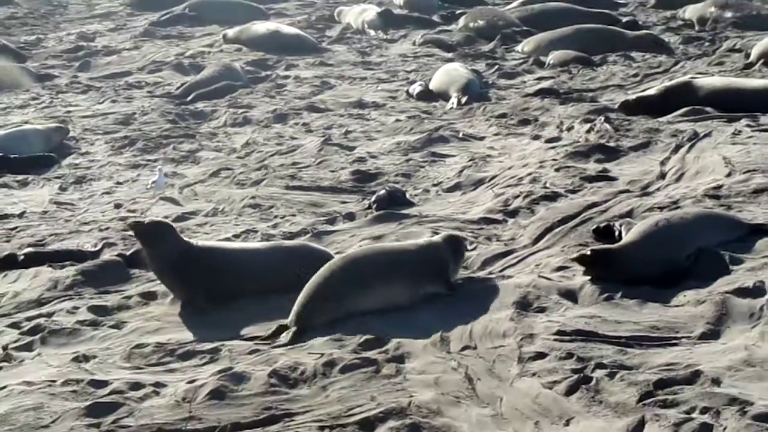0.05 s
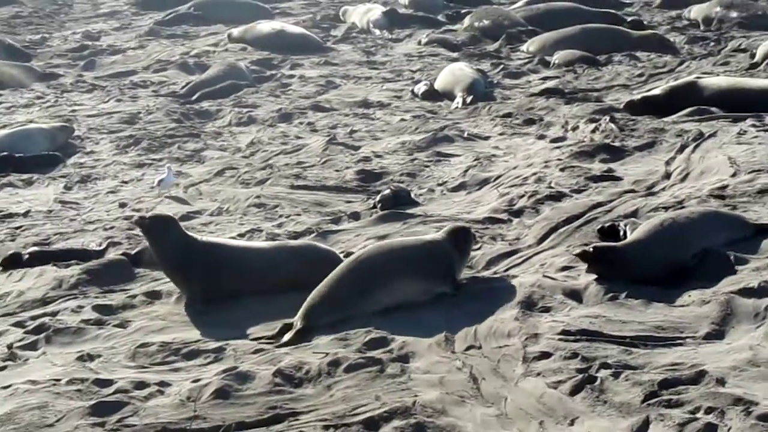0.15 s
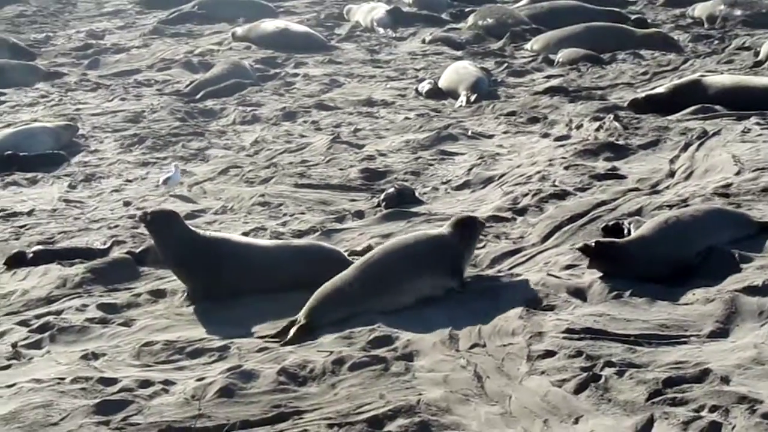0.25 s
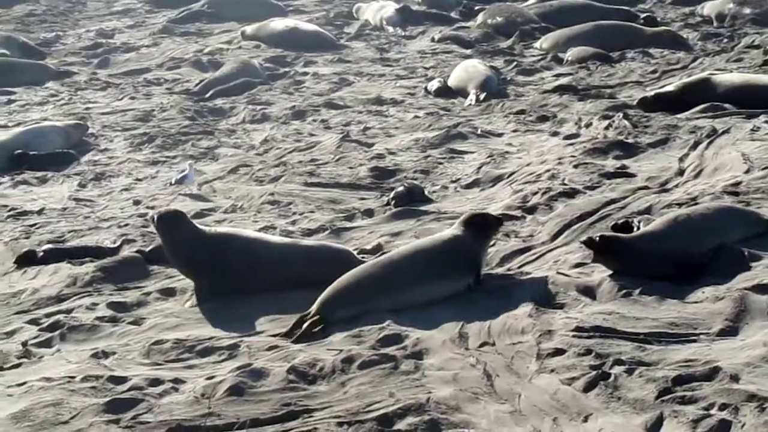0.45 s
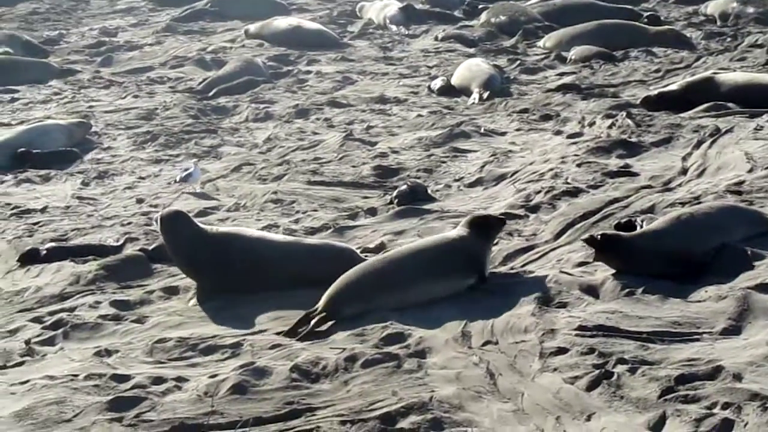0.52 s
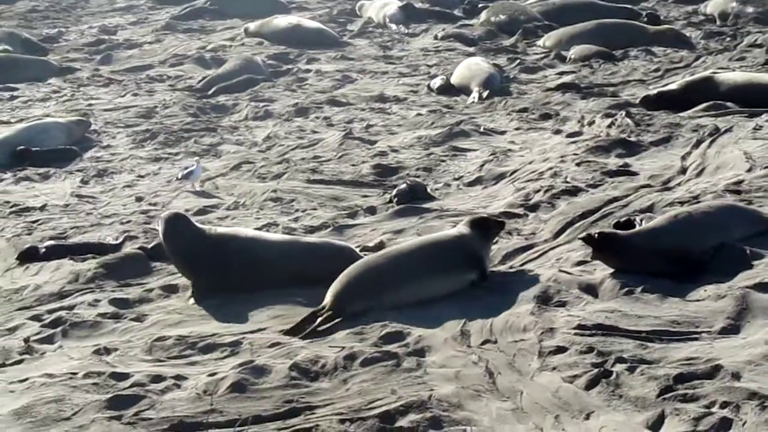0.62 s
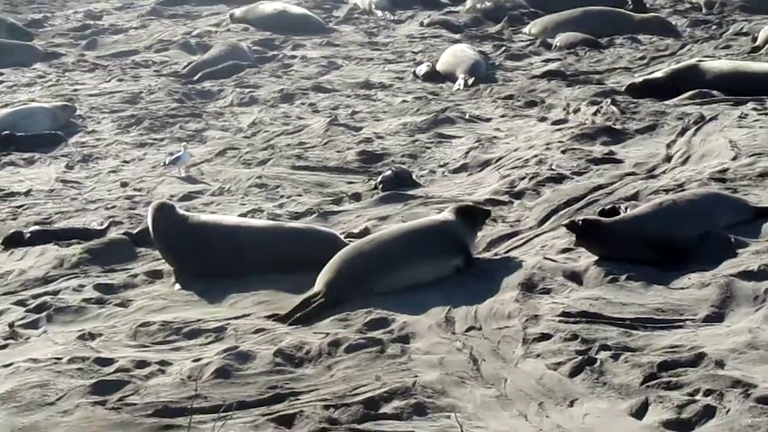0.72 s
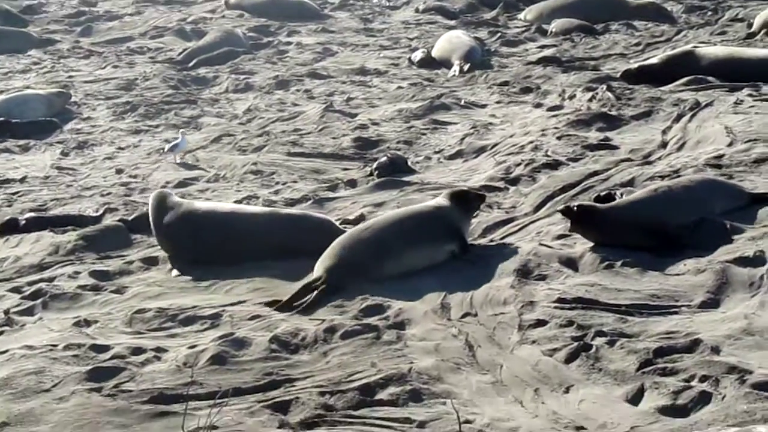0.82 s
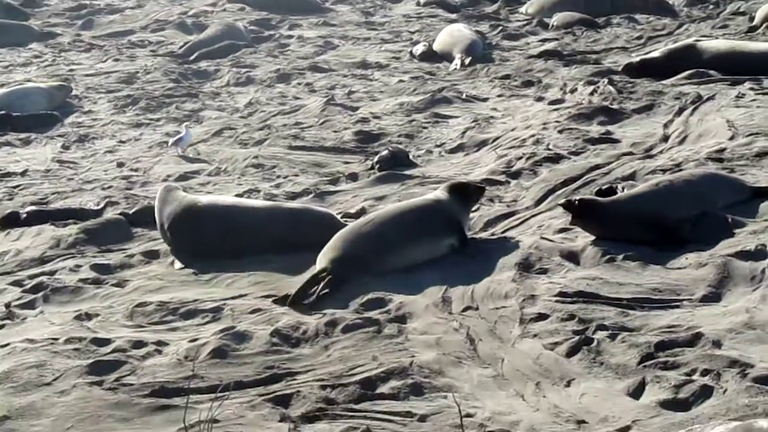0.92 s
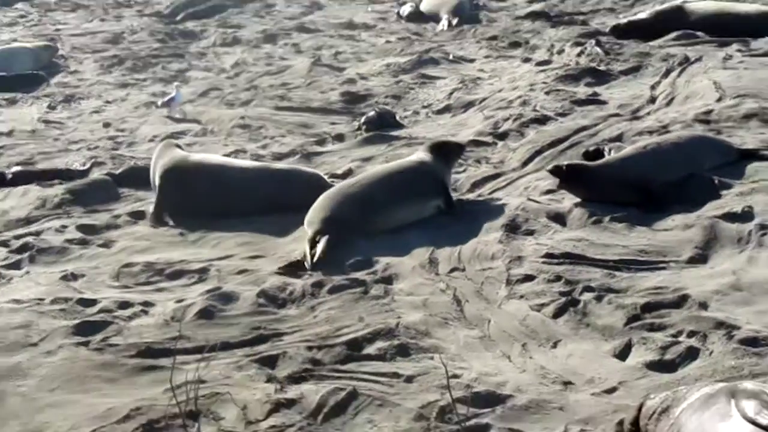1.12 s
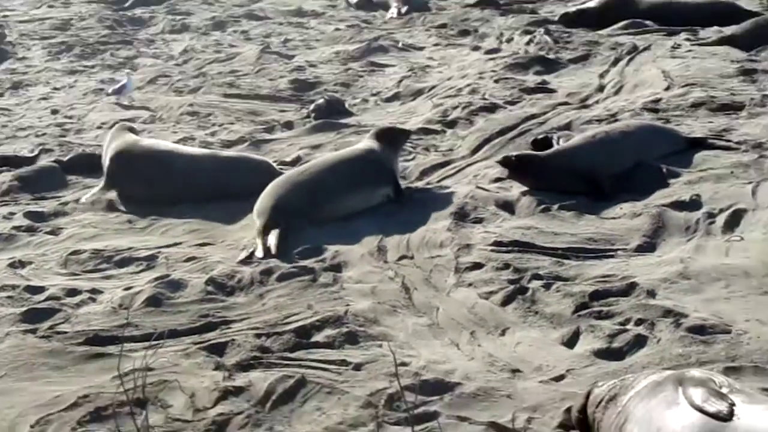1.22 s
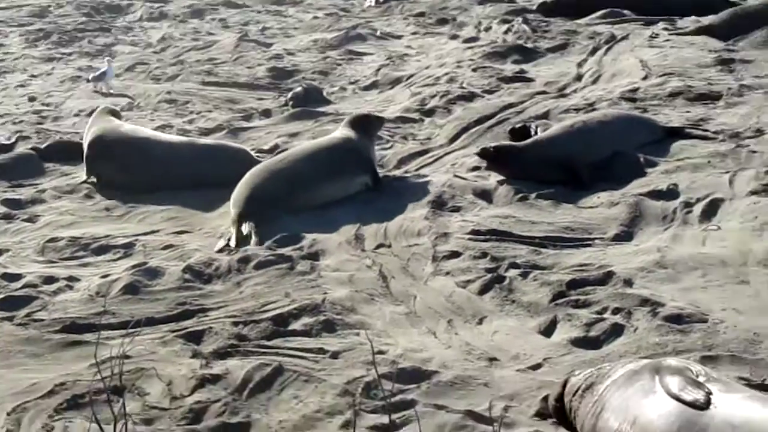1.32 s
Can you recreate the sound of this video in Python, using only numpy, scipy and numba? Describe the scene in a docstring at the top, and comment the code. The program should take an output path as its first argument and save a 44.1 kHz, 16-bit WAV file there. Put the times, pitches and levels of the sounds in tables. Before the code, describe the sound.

A young seal yelps twice, high and raspy, over steady surf and wind.

```python
"""A young seal yelps twice on a beach: a high, nearly pure cry with a faint echo.
A slower flutter in its throat breaks the cry into a rasp.
Other seals call far off over steady surf and wind, with a few faint ticks.
An automatic gain control turns everything down at the first yelp and lets it creep back."""
import sys
import numpy as np
from scipy import signal
from scipy.fft import rfft, irfft
from scipy.io import wavfile
from scipy.ndimage import uniform_filter1d, map_coordinates
from numba import njit

SR = 44100
rng = np.random.default_rng(int(sys.argv[2]) if len(sys.argv) > 2 else 0)


def log_audio(samples):
    """Write samples as a 16-bit WAV file to the path given in sys.argv[1]."""
    # one column per channel
    frames = np.atleast_2d(samples).T
    # limit to full scale, then quantise
    limited = np.clip(frames, -1, 1)
    pcm = np.round(limited * 32767).astype(np.int16)
    wavfile.write(sys.argv[1], SR, pcm)


N = 59535
T = np.arange(N) / SR


def young_seal():
    """Two short yelps close by, each harsh at first and then clearer."""
    # One list per yelp. Each row: time in seconds, pitch in Hz, level in dB,
    # then flutter depth, rasp and harshness, each from 0 to 1.
    yelps = [
        [(.224, 616, -33.5, .3, 0.97, .4), (.233, 689.2, -12, 0.23, 0.13, 0.74), (.254, 852, -7, 0, .03, 0.58),
         (.268, 894, -3.6, 0, 0, 0.3), (.305, 935.5, 0.6, 0.05, 0.03, 0.1),
         (.342, 971.4, 0.4, 0.05, 0.06, 0.11), (.379, 993.4, -3, 0.19, 0.12, 0),
         (.389, 933, -10, 0.94, 0.47, .2), (.402, 856, -17, 0.34, 1, 0.35), (.425, 820, -34.5, 0.7, 0.5, .3)],
        [(.694, 992, -41.5, 0.27, 0.58, 0), (.702, 1015, -14, 0.26, 0.33, 0.08),
         (.709, 944, -30, 0.59, 0.74, 0.45), (.714, 907.6, -15, 0.74, 0.58, 1),
         (.728, 830, -19.5, 0.61, 0.5, 0.93), (.7295, 825.4, -8.5, 0.42, 0.12, 1),
         (.751, 887, -9.5, 0.37, 0.13, 1), (.758, 983, -2.5, 0.46, 0.03, 0.54),
         (.785, 1014, -0.2, 0.29, 0, 0.18), (.815, 1037, -1.5, .55, 0.04, 0.1),
         (.831, 1004, -7, 0.5, 0.13, 0.14), (.845, 867, -14.5, 0.9, 0.76, .5), (.86, 847, -22, 0.2, .95, .6),
         (.87, 790, -50, .6, .9, .5)],
    ]
    return sum(yelp(rows) for rows in yelps)


def yelp(rows):
    """One cry: each pinch of the throat makes it lower, quieter and harsher."""
    pitch_sag, pitch_jitter, rasp_jitter, pinch_harshness = .21, .0079, .056, 1.1
    times, hz, db, depth, rasp, harsh = np.array(rows, float).T
    hz, db, depth, rasp, harsh = (np.interp(T, times, c) for c in (hz, db, depth, rasp, harsh))
    sounding = (T > times[0]) & (T < times[-1])
    pinch = depth * flutter(sounding)
    hz *= 1 - pitch_sag * pinch + pitch_jitter * wander(500) + rasp_jitter * rasp * wander(600)
    harsh = np.clip(harsh + pinch_harshness * pinch, 0, 1)
    tone = np.zeros(N)
    tone[sounding] = voice(hz[sounding], harsh[sounding])
    opening = 1 - pinch
    cry = tone * opening * np.sqrt(1 - rasp ** 2) + breath(opening, rasp)  # tone gives way to rasp
    soft_edges = uniform_filter1d(sounding * 1., size=128)
    return cry * undb(db) * soft_edges


def voice(hz, harsh):
    """Twelve harmonics (whole multiples of the pitch), blended from clear to harsh."""
    # Each row of both tables: frequency in Hz, level of a harmonic there in dB.
    clear_levels = [(650, 0), (1000, -1), (1350, -18), (1800, -12), (2000, -14.5), (2700, -42.5),
                    (3100, -45), (3800, -56.5), (5200, -59), (8500, -61.5), (11000, -63.5), (13000, -73)]
    harsh_levels = [(650, -3), (1000, -2), (1350, -23.5), (1650, -7.5), (2100, -22.5), (2550, -13.5),
                    (3000, -14.5), (3400, -48), (5200, -49), (8500, -47), (11000, -53), (13000, -64.5)]
    phase = cycles(hz)
    tone = np.zeros(len(hz))
    for k in range(1, 13):
        db = (1 - harsh) * at_hz(clear_levels, k * hz) + harsh * at_hz(harsh_levels, k * hz)
        tone += undb(db) * np.sin(k * phase)
    return np.sqrt(2) * tone


def flutter(sounding):
    """The throat pinches in slightly uneven beats: 0 is open, 1 is tightest."""
    # Each row: time in seconds, beats per second.
    beat_rates = [(.23, 179.7), (.37, 163.5), (.4, 257.6), (.728, 171.7), (.746, 75.3), (.812, 78),
                  (.828, 151.6), (.86, 246)]
    scatter, sharpness = .07, 2.2
    beat_hz = over_time(beat_rates) * (1 + scatter * wander(120))
    return (.5 + .5 * np.cos(cycles(beat_hz * sounding))) ** sharpness


def breath(opening, rasp):
    """Puffs of air ring the throat into a rasp, with a thin hiss on top."""
    # Each row: ringing frequency in Hz, width in Hz, relative level in dB.
    throat = [(820, 160, -6), (1114, 108, 5), (1632, 140, -5), (1997, 400, -11), (2480, 220, -15.5)]
    rasp_db, hiss_db = -1.5, -54.5
    air = rng.standard_normal(N) * opening
    rattle = unit(sum(undb(db) * resonate(air, hz, width) for hz, width, db in throat))
    hiss = unit(resonate(air, hz=9200, width_hz=2900))
    return undb(rasp_db) * rasp * rattle + undb(hiss_db) * hiss


def echo(x, level_db=-38, delay_s=.025, fade_60_db_s=.28):
    """The beach scatters a little sound back, differently to each ear."""
    fade = (T > delay_s) * np.exp(-np.log(1000) * T / fade_60_db_s)
    tail = unit(rng.standard_normal((2, N)) * fade) / np.sqrt(N)
    return undb(level_db) * signal.fftconvolve(x[None], tail, axes=1)[:, :N]


def far_seals(overtone_db=-11):
    """Faint, unsteady cries from further along the beach."""
    # Each row: start and length in seconds, first and last pitch in Hz, level in dB,
    # wobble as a fraction of the pitch.
    calls = [(-.02, 0.154, 655, 771.7, -32.5, 0.015), (0.127, 0.067, 676.5, 656, -39, 0.1),
             (0.424, 0.11, 834.6, 804, -32, .03), (1.291, 0.15, 652.6, 611, -26, 0.18)]
    out = np.zeros(N)
    for start, length, from_hz, to_hz, db, wobble in calls:
        progress = np.clip((T - start) / length, 0, 1)
        glide_hz = from_hz + (to_hz - from_hz) * progress
        phase = cycles(glide_hz * (1 + wobble * wander(250)))
        swell = np.sqrt(8 * progress * (1 - progress))
        out += undb(db) * swell * (np.sin(phase) + undb(overtone_db) * np.sin(2 * phase))
    return out


def ticks(fade_s=.003):
    """Tiny dry ticks close by: bursts of high noise that die at once."""
    # Each row: start in seconds, level in dB.
    bursts = [(0.906, -39), (0.929, -36.5), (1.044, -45), (1.284, -36), (1.328, -51)]
    loudness = sum(undb(db) * (T >= start) * np.exp(-np.abs(T - start) / fade_s) for start, db in bursts)
    return loudness * unit(resonate(rng.standard_normal(N), hz=5770, width_hz=3400))


def surf(swell_db=.55, flicker_db=.8):
    """The rush of surf and wind: octave bands of noise swell together and flicker separately."""
    # Each row: frequency in Hz, relative level in dB.
    spectrum = [(20, -33.5), (40, -24.5), (65, -15.5), (110, -12), (170, -6.5), (300, 1), (450, -9),
                (750, -4.5), (1200, -13), (1600, -16), (2100, -15.5), (3000, -19.5), (3900, -32),
                (5300, -28), (7500, -34), (10000, -46.5), (13000, -70.5), (16000, -74.5)]
    # Each row: frequency in Hz, level in dB of the side (opposite in the two ears)
    # against the mid (alike in both). Deep bass and high treble sound wide.
    stereo_width = [(30, 4), (60, 9.5), (125, -7), (250, -17), (600, -20), (1500, -14.5), (4000, -9),
                    (8000, -5.5), (14000, 5.5)]
    # Each row: time in seconds, level in dB.
    levels = [(0, -28), (.15, -27), (.25, -29.5), (.4, -28), (.6, -27), (.9, -28.5), (1.15, -28),
              (1.35, -25.5)]
    hz = np.arange(N // 2 + 1) * SR / N
    colour = undb(at_hz(spectrum, hz))
    mid, side = (rfft(rng.standard_normal(N)) * colour for _ in range(2))
    ears = mid + side * undb(at_hz(stereo_width, hz)) * np.array([[1], [-1]])
    octave = np.floor(np.log2(np.maximum(hz, 64)))
    bands = (irfft(ears * (octave == k), N) for k in np.unique(octave))
    swell = swell_db * wander(4)
    rush = sum(band * undb(swell + flicker_db * wander(25)) for band in bands)
    return unit(rush) * undb(over_time(levels))


def undb(db):
    """Turn decibels into a multiplier."""
    return 10 ** (np.asarray(db) / 20)


def unit(x):
    """Scale to an average strength (rms) of 1."""
    return x / np.sqrt(np.mean(x ** 2))


def wander(rate):
    """A smooth random wobble of size about 1 that changes about rate times a second."""
    hold = max(int(SR / rate), 1)
    steps = np.repeat(rng.standard_normal(N // hold + 1), hold)
    return 1.3 * uniform_filter1d(uniform_filter1d(steps, hold), hold)[:N]


def over_time(points):
    """Join (seconds, value) points with straight lines."""
    return np.interp(T, *np.array(points).T)


def at_hz(points, hz):
    """Read between (Hz, dB) points, with octaves evenly spaced."""
    point_hz, db = np.array(points, float).T
    return np.interp(np.log(hz + 1), np.log(point_hz), db)


def resonate(x, hz, width_hz):
    """Keep the sound near hz by passing it twice through a ringing filter."""
    peak = signal.iirpeak(hz, hz / width_hz, fs=SR)
    return signal.lfilter(*peak, signal.lfilter(*peak, x))


def cycles(hz):
    """Turn a pitch into a running angle in radians."""
    return 2 * np.pi * np.cumsum(hz) / SR


@njit
def follow(x, attack, release):
    """Track a level: quick up, slow down."""
    out, level = np.empty(len(x)), 0.
    for i in range(len(x)):
        level += (x[i] - level) * (attack if x[i] > level else release)
        out[i] = level
    return out


def scene():
    """The near seal slightly to the right, the colony and the sea behind it."""
    left_lag_s, pan_db = .000035, .35
    seal = young_seal()
    left = map_coordinates(seal, [(T - left_lag_s) * SR])
    ears = np.array([left * undb(-pan_db), seal * undb(pan_db)])
    return ears + echo(seal) + far_seals() + ticks() + surf()


def record(dry):
    """Gain control turns everything down under a loud call; the highest treble is cut."""
    threshold_db, ratio, attack_s, release_s, top_hz = -11, 8.7, .00097, 2.6, 15700
    level = follow(np.abs(dry).mean(axis=0), 1 / (attack_s * SR), 1 / (release_s * SR)) / np.sqrt(2)
    gain = np.minimum(undb(threshold_db) / (level + 1e-9), 1) ** (1 - 1 / ratio)
    treble_cut = signal.ellip(8, .2, 70, top_hz, fs=SR, output="sos")
    return signal.sosfilt(treble_cut, dry * gain)


dry = scene()
out = record(dry)
log_audio(out)
```